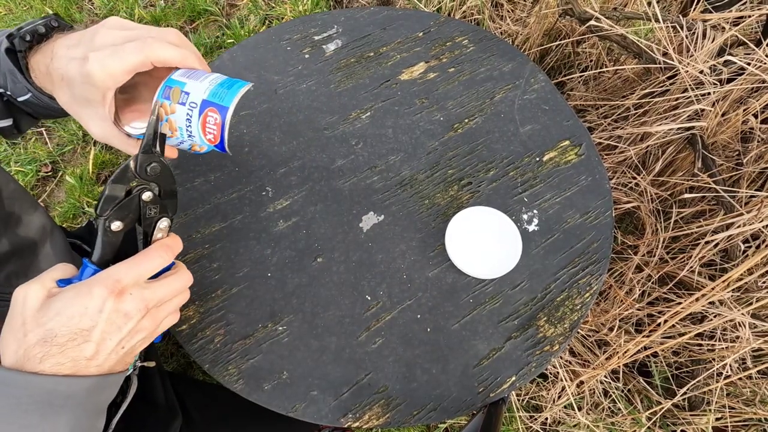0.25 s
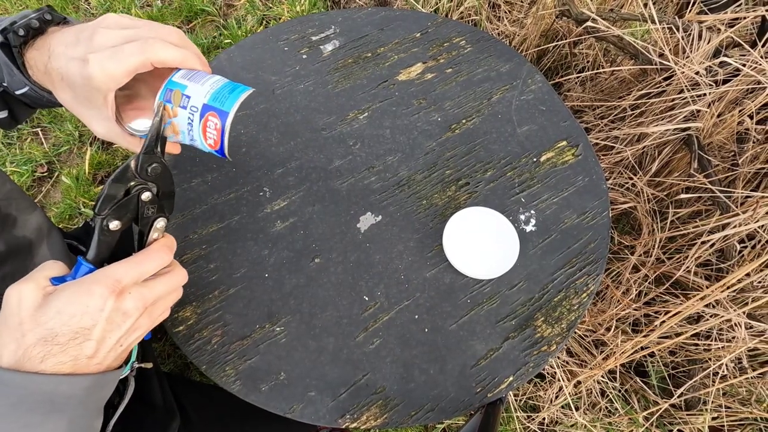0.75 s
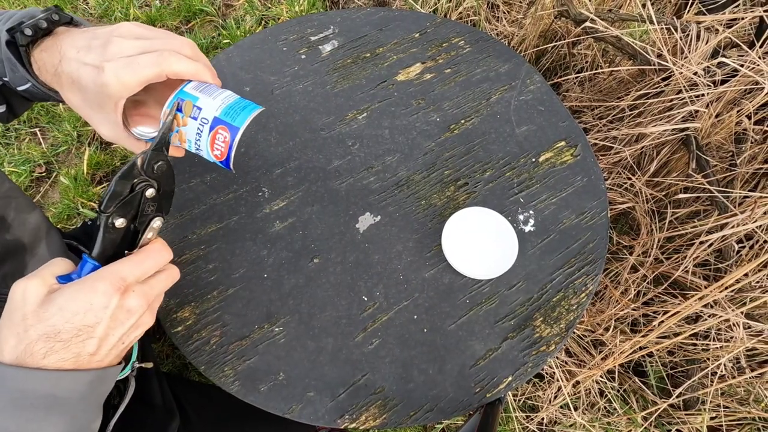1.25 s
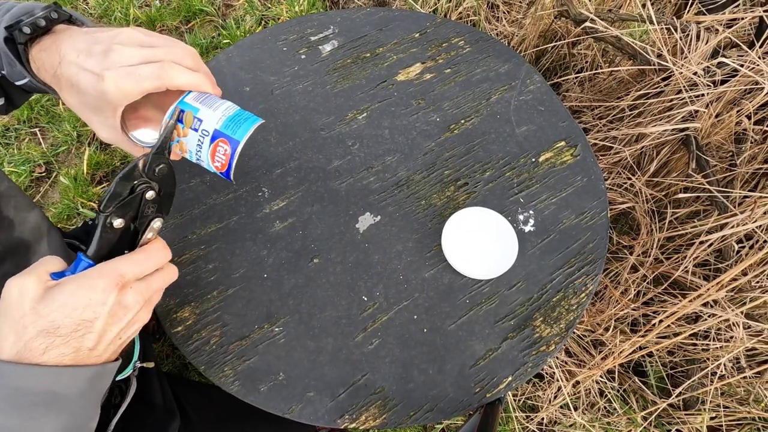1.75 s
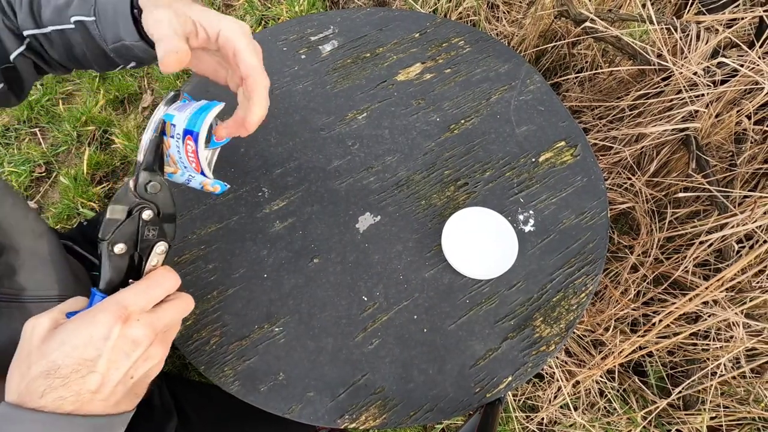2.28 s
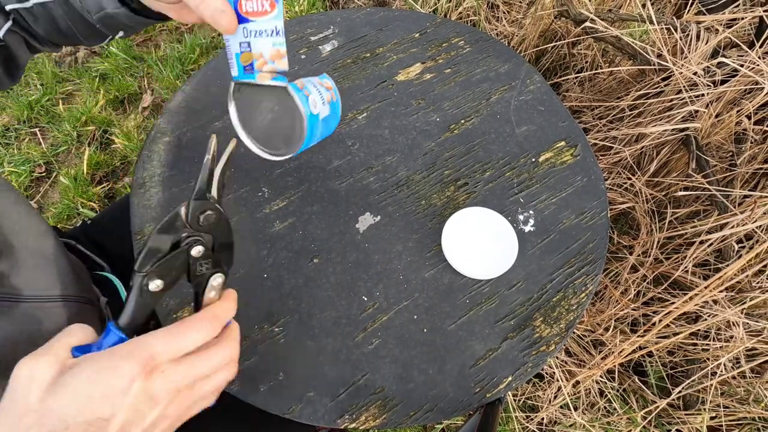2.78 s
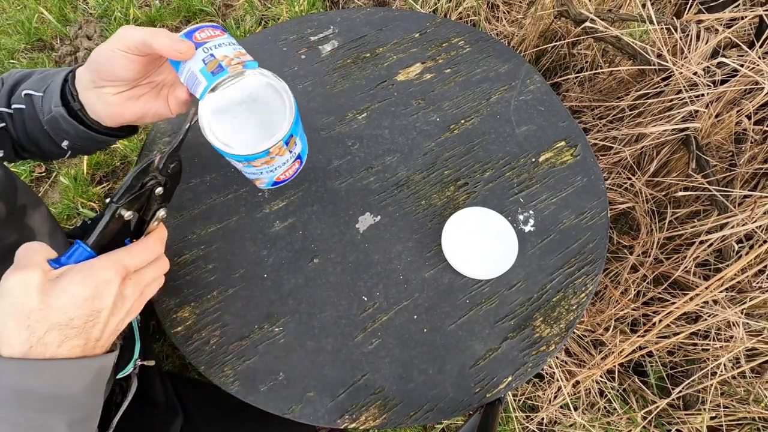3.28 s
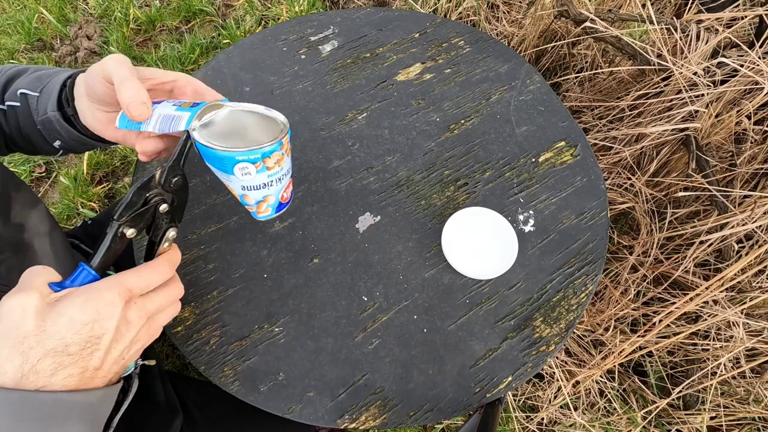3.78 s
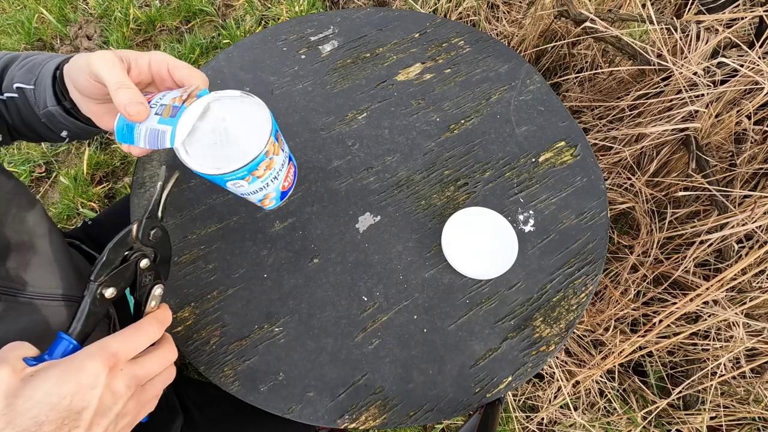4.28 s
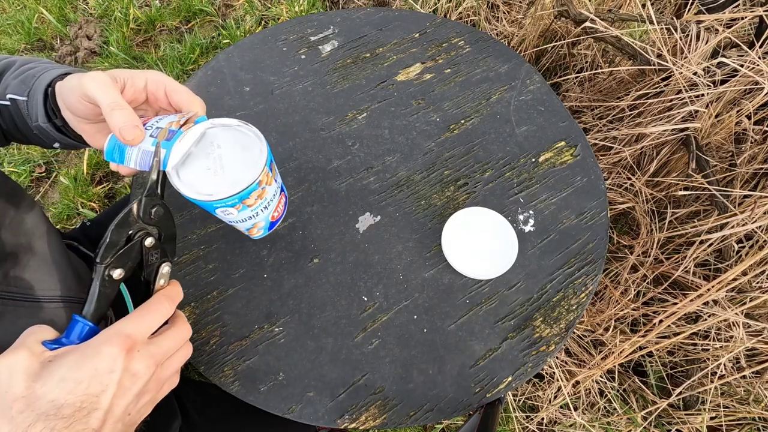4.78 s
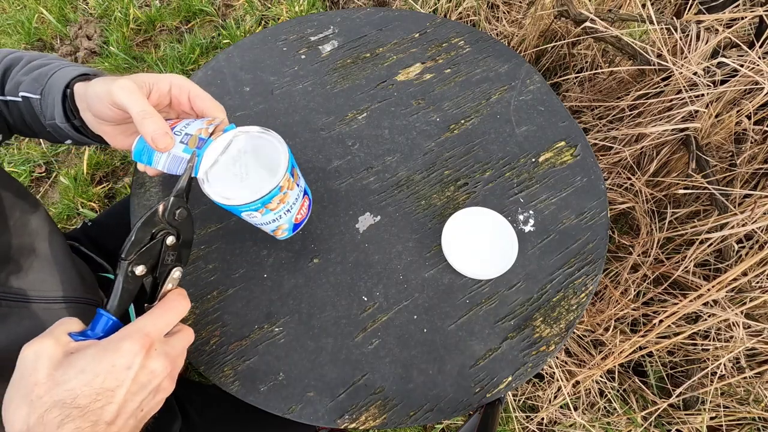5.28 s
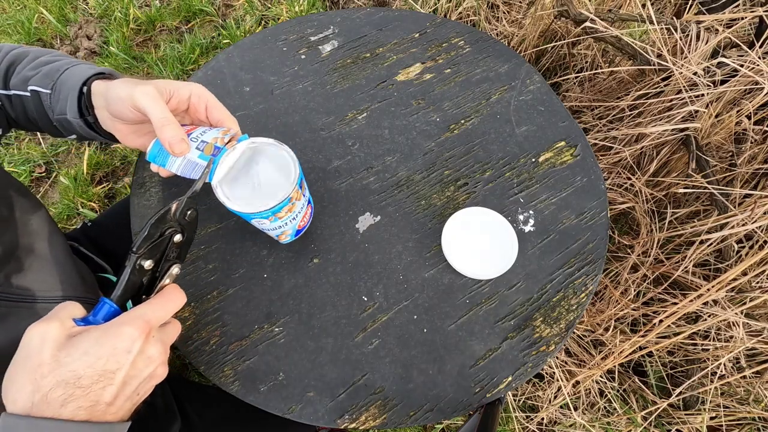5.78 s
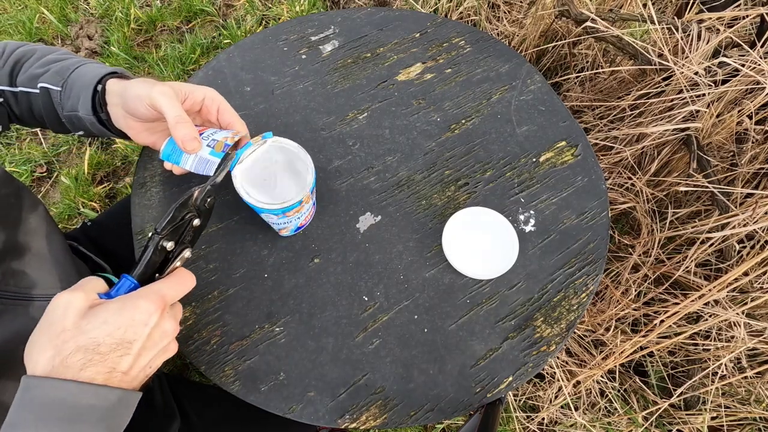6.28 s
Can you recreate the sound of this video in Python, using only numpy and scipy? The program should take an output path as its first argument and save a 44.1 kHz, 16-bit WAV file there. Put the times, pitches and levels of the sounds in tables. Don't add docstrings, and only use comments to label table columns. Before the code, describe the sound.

Close outdoor sound of snips cutting a thin steel can. Very loud, damped metallic cracks and short scrapes come in bursts for two seconds, then quieter, freer, hollow ticks as the can hangs by its strip. A brief squeak, more crunching, and the can knocks on the table, rim ringing and top booming. Faint far traffic and leaf rustle lie underneath; the image opens from mono to stereo.

```python
import sys
import numpy as np
from scipy import signal
from scipy.fft import rfft, irfft, next_fast_len
from scipy.io import wavfile
from scipy.ndimage import uniform_filter1d, map_coordinates

SR = 44100
rng = np.random.default_rng(int(sys.argv[2]) if len(sys.argv) > 2 else 0)


def output_pcm(signal):
    pcm = np.clip(np.atleast_2d(signal).T, -1, 1) * 32767
    wavfile.write(sys.argv[1], SR, np.round(pcm).astype(np.int16))


def makeup_ratio(level_db):
    decades = np.asarray(level_db, float) / 20
    return 10 ** decades


N = 288414

# start_s, peak_db, click_hz, dent_db, dent_hz, ring_db
HELD_SNAPS = [(0.0408, -41, 1710, -11, 837, -16), (0.0964, -21, 1710, -21, 949, -17),
              (0.1477, -11.5, 2430, -29.5, 382, -17.5), (0.4219, -30, 1745, -6, 954, -13),
              (0.4566, -27.5, 1750, -10.5, 607, -13.5), (0.4794, -34.5, 3020, -15, 842, -12.5),
              (0.6191, -27.5, 2780, -13.5, 387, -17.5), (0.624, -15, 2760, -17.5, 454, -17),
              (0.6322, -15.5, 2406, -23.5, 423, -16.5), (0.6719, 0.5, 2740, -27.5, 388.5, -24),
              (0.857, -2, 2890, -26, 872.5, -22), (1.1638, -32, 1510, -13.5, 559, -8.5),
              (1.1967, -25, 2620, -8.5, 941, -17.5), (1.2184, -25, 1460, -17, 893.5, -15),
              (1.2314, -23.5, 1477, -20, 493, -14.5), (1.2497, -19.5, 2730, -18.5, 502, -14),
              (1.2768, -26.5, 1976, -21.5, 804, -13.5), (1.3913, -9.5, 2660, -9.5, 893, -15.5),
              (1.4468, -0.5, 4077, -19.5, 833, -16.5), (1.4894, -30, 3120, -15.5, 772, -7.5),
              (1.5167, -23.5, 2955, -15, 802, -15), (1.5472, -30.5, 2928, -42, 389, -19.5),
              (1.5693, -31.5, 3176, -12, 386.5, -17), (1.5877, -22.5, 2304, -5, 862, -13.5),
              (1.8166, -43, 1570, 1, 827.5, -17), (1.8692, -31.5, 1600, -4, 957, -17),
              (1.8906, -22.5, 1660, -8, 532, -7), (2.1011, -31.5, 1450, -11, 941, -18)]
# start_s, peak_db, click_hz, hollow_db, edge_db, ring_db
LOOSE_SNAPS = [(2.4857, -44.5, 1470, -32, -21, -9.5), (2.5401, -40, 1560, -36, 1, -1.5),
               (2.5687, -34.5, 1053, -34, -21.5, -11), (2.6516, -37.5, 1730, -17.5, -23.5, -3),
               (2.7057, -35.5, 1690, -12.5, -29, -15), (3.0665, -51, 1330, -27.5, -18.5, 3),
               (3.0914, -37, 1180, -33, -9, -22), (3.256, -39, 1110, -19, -27.5, -21),
               (3.2804, -27.5, 1420, -16, -69, -13.5), (3.3116, -22.5, 2920, -5.5, -33.5, -25.5),
               (3.4312, -37.5, 1210, -22, -28.5, -9), (3.4421, -23, 1186, -7, -33.5, -17),
               (3.5314, -25, 1700, -8, -29, -12.5), (3.8467, -26, 1562, -16, -39.5, -13.5),
               (3.8945, -37, 1101, -17, -29, -7), (3.9458, -33, 1160, -18, -27, -9),
               (3.9794, -25, 1158, -13, -21.5, -17.5), (3.9818, -23.5, 1150, -10, -28, -9),
               (4.0181, -31.5, 1172, -5, -33, -12), (4.1494, -36, 1220, -26, -37, -15.5),
               (4.1909, -46, 1099, -21, -7, -15), (4.6692, -39.5, 1114, -24.5, -26.5, -13.5),
               (5.1542, -32, 1140, -37.5, -46, -20), (5.2011, -25, 1280, -27, -42, -20.5),
               (5.251, -25.5, 1186, -27, -41.5, -60), (5.2709, -29, 1207, -22, -34, -20),
               (5.3173, -29.5, 1100, -16, -28, -19), (5.3363, -29, 2050, -16.5, -24, -23),
               (5.3854, -34.5, 1060, -22.5, -31, -10.5), (5.5807, -13.5, 1980, -46.5, -3, -23.5),
               (5.5922, -20, 1825, -30, -10, -23.5), (5.6007, -13.5, 2000, -27, -12, -13),
               (5.6203, -8.5, 2110, -38.5, -19.5, -12.5), (5.6294, -14, 2150, -29, -17.5, -10),
               (5.6387, -7, 1102, -20.5, -18.5, -12.5), (5.8152, -36, 1152, -19, -38, -11.5),
               (5.835, -29.5, 1240, -16.5, -38, -9.5), (5.8681, -34, 1100, -13.5, -13, -6),
               (5.904, -26, 1852, -47, -3, -11), (5.9359, -30, 1690, -11, -32, -10),
               (6.0493, -11.5, 2058, -26, -18.5, -11), (6.0649, -17, 1055, -26.5, -20, -11.5),
               (6.0826, -14.5, 1217, -21.5, -13.5, -5), (6.114, -11.5, 1217, -43, -22.5, -5),
               (6.1968, -25.5, 2100, -16, -18.5, -11.5), (6.2103, -10.5, 1183, -14.5, -27, -17),
               (6.2724, -19, 1283, -22, -24, -11.5), (6.2844, -23, 1296, -10, -22.5, -13),
               (6.342, -15, 1137, -20, -25.5, -23.5), (6.3659, -8.5, 1280, -11, -30.5, -12.5),
               (6.5314, -15, 1290, -10, -27.5, -17)]
# pitch_hz, level_db, t60_s
HELD_CAN_MODES = [(1653, 0, 0.16), (1793, -12, 0.49), (2315, -7, 0.19), (2385, -18, 0.43),
                  (2487, -14, 0.27), (3079, -3, 0.14), (3784, -11, 0.28), (3924, -13, 0.15),
                  (4048, -5, 0.15), (4151, -15, 0.12), (4517, -14, 0.12), (4608, -15, 0.18),
                  (4716, -8, 0.16), (4834, -11, 0.14), (4910, -17, 0.21), (5997, -11, 0.079)]
# pitch_hz, level_db, t60_s
LOOSE_CAN_MODES = [(974, -12, .3), (1145, -2, .08), (1285, -2, .25), (1650, -14, .18), (2150, -11, .08),
                   (2298, -7, .24), (2570, -12, .16), (2940, -10, .07), (3130, -10, .17), (3290, -14, .08),
                   (3450, -12, .14), (3850, -21, .12), (4400, -20, .1), (4650, -19, .11), (5480, -21, .11),
                   (6050, -22, .09)]
# pitch_hz, level_db, t60_s
HOLLOW_MODES = [(445, 0, .22), (650, -12, .1), (738, -13, .15)]
# start_s, length_s, level_db, pitch_hz, swell_share (of the stroke)
HELD_STROKES = [(.03, 0.085, -57.5, 3500, 0.35), (.15, 0.056, -27.5, 2600, 0.033),
                (.34, 0.074, -58.5, 4000, 0.9), (.42, 0.091, -44, 2940, 0.48),
                (.612, 0.013, -42, 3050, 0.83), (.75, 0.14, -68, 4500, 0.14), (.87, 0.1, -61.5, 4000, .05),
                (1.135, 0.058, -47.5, 3630, 0.52), (1.19, .11, -39, 2430, 0.069),
                (1.36, 0.065, -57, 4800, 0.59), (1.5, 0.11, -42.5, 3200, 1),
                (1.655, .11, -64.5, 4440, 0.616), (1.815, 0.069, -58.5, 3500, 0.2),
                (1.85, 0.13, -38, 2200, 0.19), (2.045, 0.06, -64, 5000, 0.32),
                (2.09, 0.17, -61, 4500, 0.38)]
# start_s, length_s, level_db, pitch_hz, swell_share (of the stroke)
LOOSE_STROKES = [(2.46, 0.14, -63.5, 4000, 0.44), (2.535, 0.097, -50.5, 3870, 0.037),
                 (2.63, 0.037, -59, 4100, 0.17), (2.69, 0.11, -52, 3840, 0.08),
                 (3.04, 0.088, -62.5, 5000, 0.79), (3.25, 1.0, -62.5, 4520, 0.33),
                 (3.255, 0.036, -60.5, 4000, 0.4), (3.31, 0.057, -33.5, 2600, 0.041),
                 (3.43, .06, -45, 2970, .2), (3.495, 0.047, -45, 4520, 0.29), (3.56, 0.08, -51, 4000, 0.24),
                 (3.7, 0.11, -47.5, 4700, 0.55), (3.885, .07, -46, 5170, 0.11),
                 (3.975, 0.059, -35.5, 3000, 0.035), (4.08, 0.074, -57.5, 4570, 0.45),
                 (4.145, 0.076, -50, 4000, 0.23), (5.24, 0.078, -46, 2340, 0.067),
                 (5.31, 0.073, -43, 4300, 0.35), (5.585, 0.13, -41, 2240, 0.46),
                 (5.81, 0.18, -48.5, 3130, 0.65), (6.05, 0.068, -24.5, 2630, 0.91),
                 (6.2, .14, -43.5, 3070, .2), (6.34, 0.16, -34, 2560, 0.17), (6.51, 0.013, -47, 6100, 0.26)]
# pitch_hz, density_db_per_hz
RASP_SPECTRUM = [(530, -37.5), (900, -5.5), (1280, 2.5), (2000, -10), (2700, -10.5), (5600, -24.5),
                 (8600, -30.5), (15000, -36)]
# pitch_hz, width_hz, level_db
JAW_MODES = [(432, 30, -6), (1550, 200, -9), (2200, 160, 0), (2750, 150, -8), (3450, 150, -11),
             (4550, 200, -11), (5500, 200, -10), (6350, 250, -17), (7700, 250, -18)]
# start_s, table_db, rim_db, t60_scale_s
BOUNCES = [
    (6.21, -17, 9, 0.3),
    (6.27, -25.5, -4, 0.67),
    (6.343, -21, 6.5, 0.21),
    (6.365, -19.5, 13.5, 0.34),
    (6.389, -12, -4, 0.25),
    (6.399, -22, -9, 0.33),
    (6.429, -23, 5, 0.33),
    (6.531, -17, 12.5, 0.3),
]
# pitch_hz, level_db, t60_s
TABLE_MODES = [(79.5, -10, .3), (127.4, -3, 0.2), (128, -1.5, 0.067), (155, -9.5, 0.24), (181, -11, .2),
               (237, -2.5, 0.24), (335, -12, 0.43), (463.2, -9, 0.13), (551.3, -11.5, 0.26), (650, -12, .2)]
# pitch_hz, level_db, t60_s
RIM_MODES = [(974, -10, .25), (1197, -5, .35), (1286, 0, .27), (1430, -12, .2), (1507, -13, .2),
             (1701, -17, .3)]
# pitch_hz, left_minus_right_db
CAN_SIDE = [(60, 4), (120, -5), (240, -3), (490, -2.5), (1000, 0.5), (2010, 4.5), (4050, 7), (8180, 10)]
# pitch_hz, left_lead_rad
CAN_LEAD = [(0, 0), (260, -1.0), (860, -1.4), (5170, -0.5), (7060, -0.8), (8350, -0.9)]
# pitch_hz, t60_s
GARDEN_DECAY = [(200, 0.27), (2000, 0.19), (10000, 0.059)]
# start_s, rumble_db, tyre_hiss_db
ROAD_LEVELS = [(0.0, -51, -49), (0.69, -48.5, -45.5), (0.91, -50, -46.5), (1.33, -49, -45),
               (1.75, -47.5, -45), (2.2, -56.5, -53), (2.64, -58.5, -56.5), (3.37, -53, -50),
               (6.08, -51.5, -44), (6.27, -51.5, -52), (6.39, -61, -44.5), (6.54, -47, -55)]
# pitch_hz, density_db_per_hz
RUMBLE_SPECTRUM = [(15, -45), (25, -15), (103, -3.5), (125, 1), (140, -4.5), (219, -4.5), (305, -22.5),
                   (352, -19.5), (420, -22), (550, -66.5), (920, -120)]
# pitch_hz, density_db_per_hz
TYRE_SPECTRUM = [(150, -35), (250, -10), (312, -14), (352, -21), (473, -19), (590, -18.5), (771, -5),
                 (1200, 0), (2050, -16.5), (2270, -18.5), (2970, -28.5), (3250, -32.5), (8630, -70.5),
                 (11200, -102), (19000, -120)]
# pitch_hz, likeness (0 to 1)
ROAD_ALIKE = [(60, 0.38), (430, 0.5), (700, 0.94), (1400, 0.74), (3000, .78), (5000, .2)]
# pitch_hz, left_minus_right_db
ROAD_SIDE = [(60, 4.0), (160, 1), (430, -3.5), (1150, 3), (3060, 5.5), (8180, 3)]
# pitch_hz, left_lead_rad
ROAD_LEAD = [(0, -0.39), (90, -.3), (260, -1.05), (800, -1.4), (2500, -0.66), (4500, -.3)]
# pitch_hz, density_db_per_hz
LEAF_SPECTRUM = [(2060, -40.5), (3500, -13), (5130, -5), (6070, -5.5), (6600, -3), (8630, -22),
                 (11200, -48.5), (19000, -120)]
# start_s, side_share (of the side signal)
STEREO_WIDTH = [(1.85, 0), (2.1, .3), (2.4, .55), (2.8, 1)]
# pitch_hz, level_db
MIC_RESPONSE = [(20, -19), (50, -2), (90, 2.5), (7800, -1), (9500, -14.5), (14000, -16.5), (16500, -26.5)]


def unit(x):
    return x / np.sqrt(np.mean(x ** 2) + 1e-20)


def along(points, hz):
    f, v = np.transpose(points)
    return np.interp(np.log(hz + 50), np.log(f + 50), v)


def curves(rows):
    s, *columns = np.transpose(rows)
    return [np.interp(np.arange(N) / SR, s, column) for column in columns]


def wobble(rate):
    knots = rng.standard_normal(int(N * rate / SR) + 4)
    return map_coordinates(knots, [np.arange(N) * rate / SR])


def filtered(x, response):
    size = next_fast_len(x.shape[-1] + 8192)
    spectrum = rfft(x, size) * response(np.fft.rfftfreq(size, 1 / SR))
    return irfft(spectrum, size)[..., :x.shape[-1]]


def band(hz, width):
    return lambda f: 1j * f * width / (hz * hz - f * f + 1j * f * width)


def steep_band(hz, width):
    return lambda f: band(hz, width)(f) ** 2


def ports(x, side, lead):
    half = lambda hz: makeup_ratio(along(side, hz) / 2) * np.exp(.5j * along(lead, hz))
    return filtered(x, lambda hz: np.array([half(hz), 1 / half(hz)]))


def ringing(modes, t, scatter_db, detune, stretch=1, rise=.001):
    hz, db, t60 = np.transpose(modes)[:, :, None]
    strength, shift, damping = rng.standard_normal((3, len(modes), 1))
    fade_db = 60 * t / (t60 * stretch * makeup_ratio(-2 * np.abs(damping)))
    level = makeup_ratio(db + scatter_db * strength - fade_db)
    tones = level * np.sin(2 * np.pi * hz * (1 + detune * shift) * t)
    return tones.sum(0) * (1 - np.exp(-t / rise))


def add(track, s, sound):
    part = track[round(s * SR):][:len(sound)]
    part += sound[:len(part)]


def snap(hz, edge_db, ring_db, can, detune, stretch):
    t, modes = np.arange(SR // 5) / SR, np.array(can)
    noise = rng.standard_normal((3, len(t)))
    crackle = unit(filtered(noise[0], steep_band(hz * 0.96, hz * 1.1)))
    buckle = makeup_ratio(-60 * t / 0.017) * (np.sin(2 * np.pi * hz * t) + .5 * crackle)
    edge = makeup_ratio(edge_db - 60 * t / 0.032) * unit(filtered(noise[1], steep_band(4800, 8500)))
    octaves_away = np.abs(np.log2(modes[:, :1] / hz))
    near = modes - [0, 1, 0] * (3 * octaves_away)
    shimmer = makeup_ratio(-4.5 - 60 * t / 0.077) * unit(filtered(noise[2], steep_band(1800, 3500)))
    ring = makeup_ratio(ring_db) * (ringing(near, t, 2.0, detune, stretch) + shimmer)
    return t, (buckle + edge + ring) * (1 - np.exp(-t / 0.00005))


def held_snaps():
    out = np.zeros(N)
    for s, db, hz, dent_db, dent_hz, ring_db in HELD_SNAPS:
        t, sound = snap(hz, -21.5, ring_db, HELD_CAN_MODES, detune=.015, stretch=.75)
        dent_modes = [(dent_hz, dent_db + 6.0, .06), (dent_hz * 1.4, dent_db + 0.5, .04)]
        dent = ringing(dent_modes, t, 2.5, 0.013)
        add(out, s + .0002, makeup_ratio(db) * (sound + dent))
    return out


def loose_snaps():
    out = np.zeros(N)
    for s, db, hz, hollow_db, edge_db, ring_db in LOOSE_SNAPS:
        t, sound = snap(hz, edge_db - 4.0, ring_db, LOOSE_CAN_MODES, detune=.003, stretch=1.0)
        hollow = makeup_ratio(hollow_db + 0.5) * ringing(HOLLOW_MODES, t, 1.6, 0.0033, rise=0.0016)
        add(out, s + 0.00017, makeup_ratio(db) * (sound + hollow))
    return out


def strokes(table, can, hollow_db, count):
    out = np.zeros(N)
    for s, length, db, hz, swell in table:
        u = np.arange(round((length + 0.12) * SR)) / SR / length
        swell = np.clip(swell, .03, .9)
        release = np.clip((u - swell) / (1 - swell), 0, 4)
        force = np.minimum(u / swell, 1) ** 1.5 * makeup_ratio(-22 * release ** 1.9)

        chance, size = rng.random((2, len(u)))
        slips = (chance < 1400 / SR) * np.clip(-np.log(size + 1e-9), 0, 3) ** 1.5
        clumps = np.interp(u * length * 70, np.arange(90), rng.standard_normal(90))
        push = force * makeup_ratio(3 * clumps) * (.35 + slips) * rng.standard_normal(len(u))

        strip_hz = rng.uniform(2500, 9500, size=count)
        pitches = np.append(np.transpose(can)[0], strip_hz)
        gains = makeup_ratio(5 * rng.standard_normal(len(pitches) + 1))
        wall = lambda f: sum((-1) ** k * gains[k] * band(p, 45.0 + .025 * p)(f) for k, p in enumerate(pitches))
        hollow = lambda f: makeup_ratio(hollow_db) * gains[-1] * band(447, 22)(f)
        rasp = lambda f: makeup_ratio(along(RASP_SPECTRUM, f)) * (.3 + band(hz, hz * .6)(f))
        sound = filtered(push, lambda f: rasp(f) * (0.69 + wall(f)) + hollow(f))
        add(out, s, makeup_ratio(db) * unit(sound) * np.sqrt(length / (length + .15)))
    return out


def squeak():
    out, t = np.zeros(N), np.arange(SR // 6) / SR
    stop = np.clip((.088 - t) / 0.022, 0, 1)
    force = stop * makeup_ratio(-70.0 * t) * (1 - np.exp(-t / 0.00067))
    jaws = lambda f: sum(makeup_ratio(db) * steep_band(hz, width)(f) for hz, width, db in JAW_MODES)
    add(out, 4.737, makeup_ratio(-41) * unit(filtered(force * rng.standard_normal(len(t)), jaws)))
    return out


def thump():
    out, t = np.zeros(N), np.arange(SR // 8) / SR
    handles = [(173, -10, 0.037), (310, -11, .04), (510, -7.5, 0.014)]  # pitch_hz, level_db, t60_s
    add(out, .6725, ringing(handles, t, 0, 0, rise=0.00091))
    return out


def bounces():
    out, t = np.zeros(N), np.arange(SR // 2) / SR
    for s, db, rim_db, scale in BOUNCES:
        boom = ringing(TABLE_MODES, t, 1.6, .01, scale * 2.4, rise=0.003)
        knock = unit(filtered(rng.standard_normal(len(t)), steep_band(500, 900)))
        rattle = makeup_ratio(-10.5 - 60 * t / (scale * .6)) * knock
        rim = makeup_ratio(rim_db - 7.0) * ringing(RIM_MODES, t, 1.5, 0.0018, scale * 2.57)
        add(out, s, makeup_ratio(db + 1.0) * (boom + rattle + rim))
    return out


def garden(x):
    hz, t, z = signal.stft(rng.standard_normal((2, SR // 4)), SR, nperseg=256)
    fade = makeup_ratio(-60 * t / along(GARDEN_DECAY, hz)[:, None])
    tail = signal.istft(z * fade, SR, nperseg=256)[1]
    late = np.pad(x, (120, 0))[None]
    return signal.fftconvolve(late, tail / np.linalg.norm(tail[0]), axes=1)[:, :N]


def road():
    out = 0
    turn = lambda hz: np.arccos(np.clip(along(ROAD_ALIKE, hz), 0, 1)) / 2
    layers = zip(curves(ROAD_LEVELS), (RUMBLE_SPECTRUM, TYRE_SPECTRUM), (1.4, 1.1))
    for level_db, spectrum, sway_db in layers:
        z = signal.stft(rng.standard_normal((2, N)), nperseg=512)[2]
        field = uniform_filter1d(rng.standard_normal(z.shape[1:]), size=6, axis=0)
        field = uniform_filter1d(field, size=14, axis=1)
        pair = signal.istft(z * makeup_ratio(1.5 * unit(field)), nperseg=512)[1][:, :N]
        split = lambda hz: makeup_ratio(along(spectrum, hz)) * [np.cos(turn(hz)), np.sin(turn(hz))]
        mid, side = filtered(pair, split)
        level = makeup_ratio(level_db + 1.0 + sway_db * wobble(5.0))
        out = out + level * unit(np.array([mid + side, mid - side]))
    return ports(out, ROAD_SIDE, ROAD_LEAD)


def leaves():
    hiss = unit(filtered(rng.standard_normal((2, N)), lambda hz: makeup_ratio(along(LEAF_SPECTRUM, hz))))
    return makeup_ratio(-81.5 + 2.2 * wobble(4.5) + 1.5 * wobble(3.0)) * hiss


def scene():
    held_drags = strokes(HELD_STROKES, HELD_CAN_MODES, -8.5, count=12)
    loose_drags = strokes(LOOSE_STROKES, LOOSE_CAN_MODES, -1.5, count=12)
    can = held_snaps() + loose_snaps() + held_drags + loose_drags + squeak() + thump() + bounces()
    return ports(can, CAN_SIDE, CAN_LEAD) + makeup_ratio(-24) * garden(can) + road() + leaves()


def top_cut(x):
    return signal.sosfilt(signal.butter(12, 15800, fs=SR, output="sos"), x)


def record(dry):
    heard = filtered(dry, lambda hz: makeup_ratio(along(MIC_RESPONSE, hz)))
    mid = heard.mean(0)
    side = curves(STEREO_WIDTH)[0] * (heard[0] - heard[1]) / 2
    mix = np.clip([mid + side, mid - side], -1, 1)
    return top_cut(mix)


dry = scene()
out = record(dry)
output_pcm(out)
```